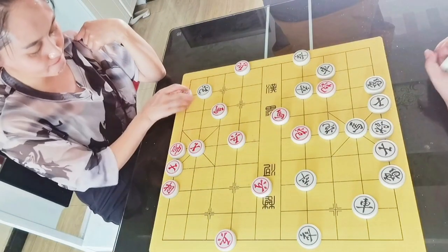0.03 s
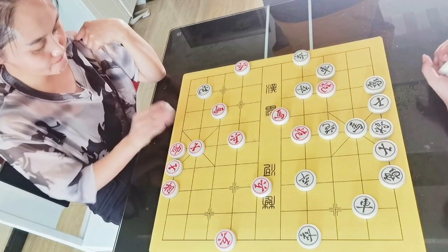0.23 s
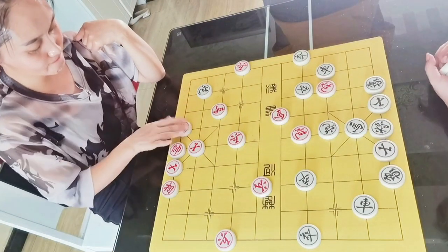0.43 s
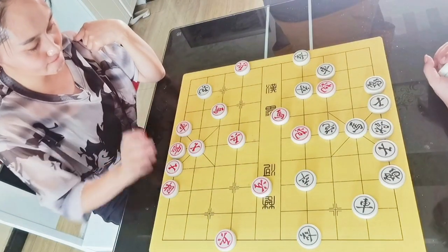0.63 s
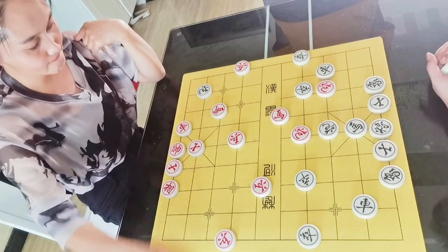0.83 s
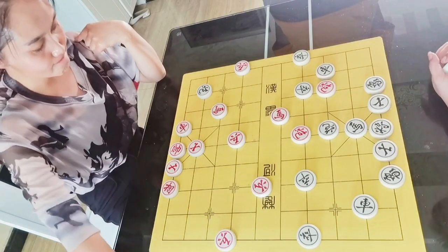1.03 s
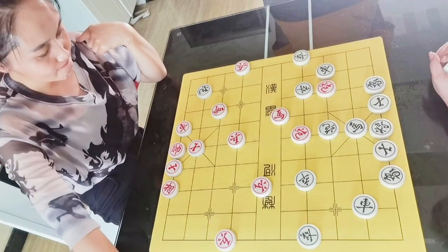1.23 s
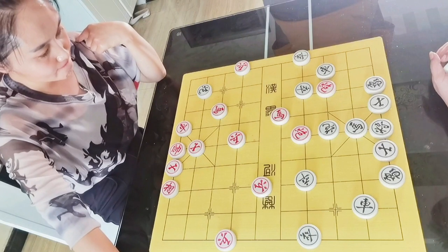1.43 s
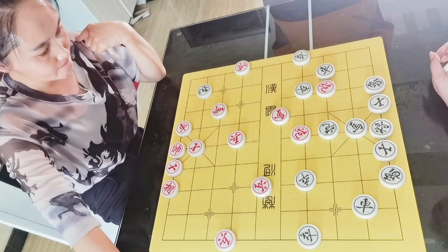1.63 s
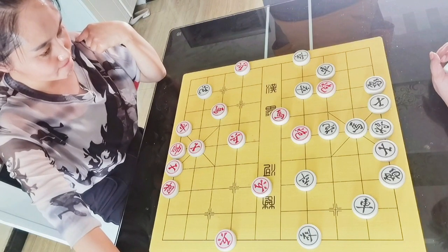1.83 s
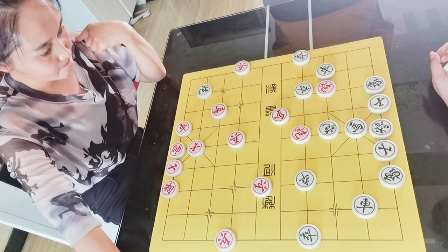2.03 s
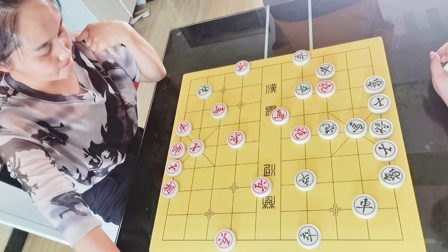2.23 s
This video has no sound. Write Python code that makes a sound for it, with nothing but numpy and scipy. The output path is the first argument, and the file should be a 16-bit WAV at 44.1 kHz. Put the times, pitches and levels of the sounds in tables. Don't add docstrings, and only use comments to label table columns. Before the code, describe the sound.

A round game piece is slapped hard onto a board, one sharp loud clack with a low table boom and roomy tail; light piece clicks before and after, then a dull late knock, close phone microphone.

```python
import sys
import numpy as np
from scipy import signal
from scipy.fft import rfft, irfft
from scipy.io import wavfile

SR = 44100
rng = np.random.default_rng(int(sys.argv[2]) if len(sys.argv) > 2 else 0)


def store_pcm(level_fs):
    pcm = np.round(np.clip(level_fs, -1, 1) * 32767).astype(np.int16)
    wavfile.write(sys.argv[1], SR, np.atleast_2d(pcm).T)


def undo_db(level):
    steps = np.asarray(level, float) / 20
    return 10 ** steps


N = 100900


def at_hz(points, hz):
    table_hz, value = np.array(points).T
    return np.interp(np.log(np.maximum(hz, 1)), np.log(table_hz), value)


def rms_one(x):
    return x / np.sqrt(np.mean(x ** 2) + 1e-20)


def energy_one(x):
    return x / np.sqrt(np.sum(x ** 2))


def butter(x, order, hz, kind):
    return signal.sosfilt(signal.butter(order, hz, kind, fs=SR, output="sos"), x)


def causal(x, level_db):
    size = 4096
    cepstrum = irfft(level_db(np.fft.rfftfreq(size, 1 / SR)) * np.log(10) / 20)
    cepstrum[1:size // 2] *= 2
    cepstrum[size // 2 + 1:] = 0
    impulse = irfft(np.exp(rfft(cepstrum)))
    return signal.fftconvolve(x, impulse)[:len(x)]


def ring(clicks, hz, t60_s):
    radius = undo_db(-60 / (t60_s * SR))
    angle = 2 * np.pi * hz / SR
    return signal.lfilter([0, np.sin(angle)], [1, -2 * radius * np.cos(angle), radius ** 2], clicks + 1e-18)


def click(start_s, db):
    out = np.zeros(N)
    out[(np.asarray(start_s) * SR).astype(int)] = undo_db(db)
    return out


def bands():
    settle = 4000
    edges_hz = 16 * 2 ** np.arange(0, 10.1, 1 / 3)
    white = rng.standard_normal((2, N + settle))
    for k, (low, high) in enumerate(zip(edges_hz, edges_hz[1:])):
        yield np.sqrt(low * high), butter(white[k % 2], 4, [low, high], "band")[settle:]


def hum():
    # f/Hz, level/dB per Hz
    hum_colour = [(12, -50.5), (20, -17.5), (64, 3.5), (196, -10.5), (382, -12.5), (1010, -27.5),
                  (2540, -31), (5850, -43.5), (15500, -50.5)]
    level_db, start_db, settle_s = -56, 6, .6
    noise = rms_one(sum(undo_db(at_hz(hum_colour, hz)) * band for hz, band in bands()))
    return undo_db(level_db + start_db * np.exp(-np.arange(N) / SR / settle_s)) * noise


def pieces():
    # t/s, level/dB, brightness/dB
    touches = [(0.0752, -14.5, -1.5), (0.086, -20, 9), (0.094, -11, -2.5), (0.1523, -9.5, 5.5),
               (0.171, -23.5, 17.5), (0.177, -24.5, 10), (0.182, -17, -6), (.203, -20.5, -3.5),
               (0.3437, -28.5, 4), (0.4465, -5.5, -9), (1.318, -10, -11.5), (1.333, -17, 14),
               (1.342, -29, 14.5), (1.353, -20, 14)]
    # f/Hz, level/dB, t60/s
    piece_modes = [(1587, -37, .04), (2157.7, -38.5, .012), (4250, -43.5, 0.013), (2900, -43.5, 0.0094),
                   (5560, -48.5, .006)]
    # f/Hz, level/dB per Hz
    tick_colour = [(650, -49.5), (1100, -21.5), (1490, -0.5), (1900, -6), (4040, -4.5), (7780, -17.5),
                   (8970, -2.5), (10100, -5), (15000, -33)]
    bright_hz, luck_db, ring_low_cut_hz = 7000, 3, 1800

    start_s, db, bright_db = np.transpose(touches)
    luck = rng.normal(0, luck_db, (len(start_s), len(piece_modes)))
    dull = signal.lfilter(*signal.butter(2, bright_hz, "low", fs=SR), click(start_s, db))
    bright = signal.lfilter(*signal.butter(2, bright_hz, "high", fs=SR), click(start_s, db + bright_db))
    rings = np.zeros(N)
    for k, (hz, mode_db, t60_s) in enumerate(piece_modes):
        strike_db = db + mode_db + luck[:, k] + bright_db * (hz > bright_hz)
        rings += ring(click(start_s, strike_db), hz, t60_s)
    rings = signal.lfilter(*signal.butter(2, ring_low_cut_hz, "high", fs=SR), rings)
    return causal(dull + bright, lambda hz: at_hz(tick_colour, hz)) + rings


SLAP_S = .4517


def slap():
    # f/Hz, level/dB per Hz
    clack_colour = [(88, -48.5), (150, -23), (428, -11), (490, -5), (736, -15), (2180, -2.5), (7710, -8),
                    (9360, -1.5), (15500, -24)]
    # f/Hz, level/dB, t60/s
    clack_modes = [(1272.7, -31, .05), (1790, -30.5, .05), (2213, -46, 0.25), (2820, -37.5, .06),
                   (3525, -31, .03), (3856, -29.5, .03), (5030, -36, .04), (5600, -30, .03)]
    slap_db, ring_db = 40.5, -12.5
    hit = click([SLAP_S], slap_db)
    rings = sum(undo_db(db + ring_db) * ring(hit, hz, t60_s) for hz, db, t60_s in clack_modes)
    return causal(hit, lambda hz: at_hz(clack_colour, hz)) + rings


def table():
    # f/Hz, level/dB, t60/s
    table_modes = [(68, -3, 0.15), (126, -25.5, 0.69), (220, -8.5, .04), (350.2, -16, .5), (495, -18, 0.33),
                   (85, -28.5, .6)]
    push = signal.lfilter([.05], [1, -.95], click([SLAP_S], 0))
    return sum(undo_db(db) * ring(push, hz, t60_s) for hz, db, t60_s in table_modes)


def knocks():
    # t/s, level/dB, brightness/dB per octave
    blow_events = [
        (1.1267, -19, 5.5),
        (1.146, -16.5, 5),
        (2.191, -1, 0.6),
    ]
    # f/Hz, level/dB per Hz
    blow_colour = [(60, 2), (130, -6), (300, 9.5), (700, -5.5), (1300, -16), (2200, -20.5), (5000, -34),
                   (12000, -48)]
    # f/Hz, level/dB, t60/s
    wood_modes = [(126.67, -57.5, 0.076), (299, -31.5, 0.062), (428, -47, 0.01), (1770, -60, 0.011)]
    tilt_from_hz = 300

    blows = np.zeros(N)
    for start_s, db, tilt_db in blow_events:
        def colour(hz):
            octaves = np.log2(np.maximum(hz, tilt_from_hz) / tilt_from_hz)
            return at_hz(blow_colour, hz) + max(tilt_db, 0) * octaves
        blows += causal(click([start_s], db), colour)
    start_s, db, _ = np.transpose(blow_events)
    push = signal.lfilter([.1], [1, -.9], click(start_s, db))
    return blows + sum(undo_db(mode_db) * ring(push, hz, t60_s) for hz, mode_db, t60_s in wood_modes)


def squeaks():
    # t/s, length/s, f/Hz, width/Hz, level/dB
    squeak_events = [
        (1.42, .3, 2560, 200, -71),
        (1.675, 0.22, 2600, 119, -72.5),
        (1.95, 0.037, 1370, 80.1, -70.5),
        (1.981, .08, 2030, 60, -69.5),
    ]
    out = np.zeros(N)
    t = np.arange(N) / SR
    for start_s, length_s, hz, width_hz, db in squeak_events:
        t60_s = np.log(1000) / np.pi / width_hz
        tone = rms_one(ring(rng.standard_normal(N), hz, t60_s))
        swell = np.sin(np.pi * np.clip((t - start_s) / length_s, 0, 1)) ** .5
        out += undo_db(db) * tone * swell
    return out


def crack(x, spread_s):
    t = np.arange(1000) / SR
    burst = rng.standard_normal(1000) * np.exp(-(t / spread_s) ** 4)
    return signal.fftconvolve(x, energy_one(burst))[:N]


def room(loud, faint):
    # f/Hz, t60/s
    room_t60 = [(100, 0.45), (500, .55), (2500, 0.56), (5000, 0.51), (7500, 0.35), (9500, 0.35),
                (12000, .31), (15000, 0.31)]
    gap_s, room_db, build_s = .002, 0.5, .008
    knee_s, knee_db_per_s = .39, 139
    next_db, next_t60_s, next_band_hz = -35, .85, [1660, 4300]
    faint_fade_db_per_s, faint_build_s = 50.5, .002

    t = np.maximum(np.arange(N) / SR - gap_s, 0)
    tail = sum(noise * undo_db(-60 * t / at_hz(room_t60, hz)) for hz, noise in bands())
    tail = tail * undo_db(-knee_db_per_s * np.maximum(t - knee_s, 0))
    next_room = rms_one(butter(rng.standard_normal(N), 2, next_band_hz, "band"))
    tail = tail + next_room * undo_db(next_db - 60 * t / next_t60_s)
    faint_tail = energy_one(tail * undo_db(-faint_fade_db_per_s * t) * (1 - np.exp(-t / faint_build_s)))
    loud_tail = undo_db(room_db) * energy_one(tail * (1 - np.exp(-t / build_s)))
    return (signal.fftconvolve(loud, loud_tail) + signal.fftconvolve(faint, faint_tail))[:N]


def scene():
    ticks, blow, thuds = pieces(), slap(), knocks()
    near = undo_db(-4.5) * crack(ticks, spread_s=.0014)
    near = near + undo_db(-8) * crack(blow, spread_s=.0045)
    near = near + undo_db(-2) * thuds
    mix = near + room(blow + thuds, ticks) + table() + squeaks() + hum()
    return mix[None]


def limiter(x):
    limit_db, attack_s, release_db_per_s = -1.5, 0.0018, 498.5
    fall_db = release_db_per_s * np.arange(N) / SR
    level_db = np.maximum.accumulate(20 * np.log10(np.abs(x) + 1e-9) + fall_db) - fall_db
    r = np.exp(-1 / (attack_s * SR))
    cut_db = signal.lfilter([1 - r], [1, -r], np.maximum(level_db - limit_db, 0))
    return x * undo_db(-cut_db)


def top_cut(x):
    return signal.sosfilt(signal.butter(12, 16800, fs=SR, output="sos"), x)


def record(dry):
    # f/Hz, width/Hz, level/dB
    port = [(7870, 720, -8.5), (9400, 1500, 1.5)]
    low_cut_hz, hiss_db, clip_top, cutoff_hz = 42, -76.5, 0.69, 15900
    x = causal(dry[0], lambda hz: sum(db * np.exp(-((hz - f) / width) ** 2) for f, width, db in port))
    x = butter(x, 2, low_cut_hz, "high")
    x = x + undo_db(hiss_db) * rng.standard_normal(N)
    x = limiter(x)
    x = clip_top * np.tanh(x / clip_top)
    x = signal.sosfilt(signal.cheby2(12, 50, cutoff_hz * 1.03, fs=SR, output="sos"), x)
    return top_cut(x[None])


dry = scene()
out = record(dry)
store_pcm(out)
```